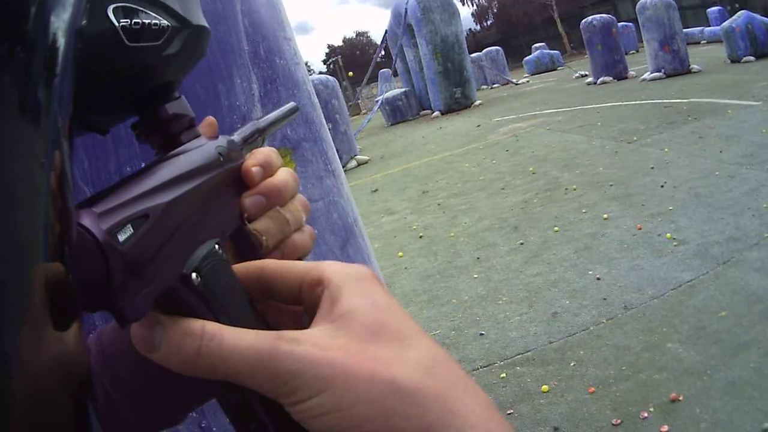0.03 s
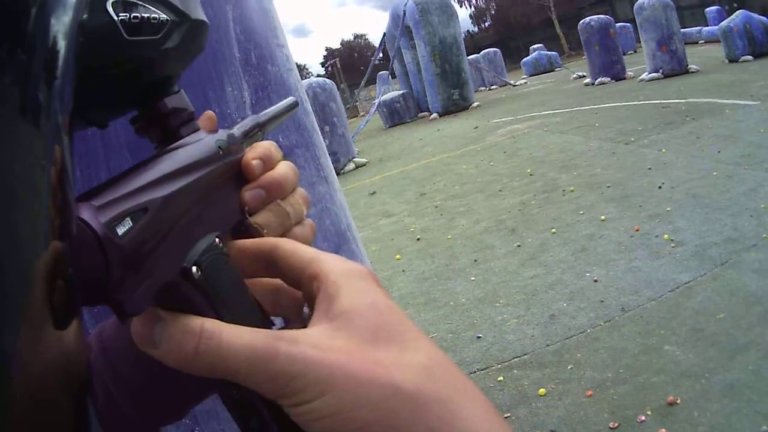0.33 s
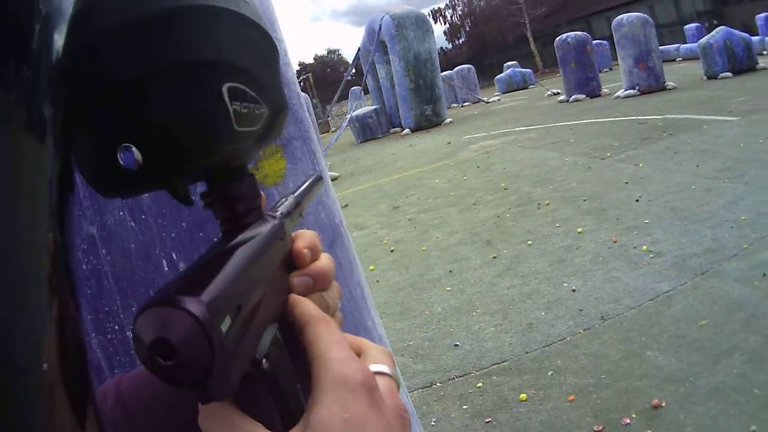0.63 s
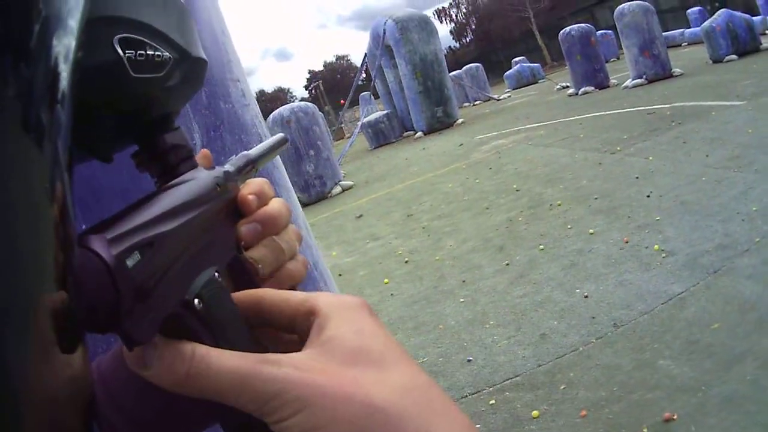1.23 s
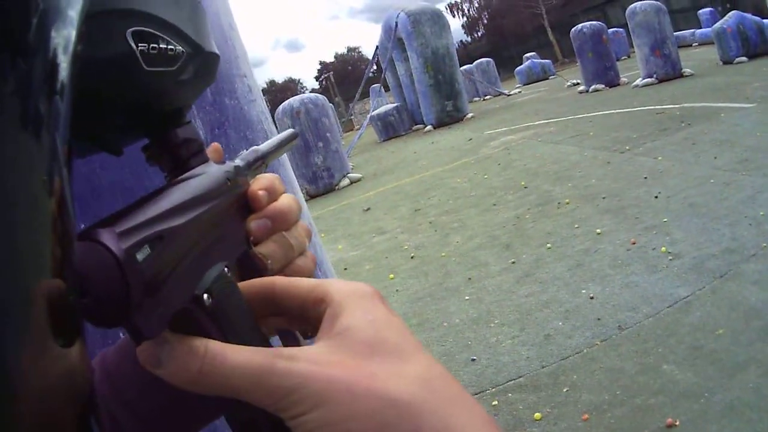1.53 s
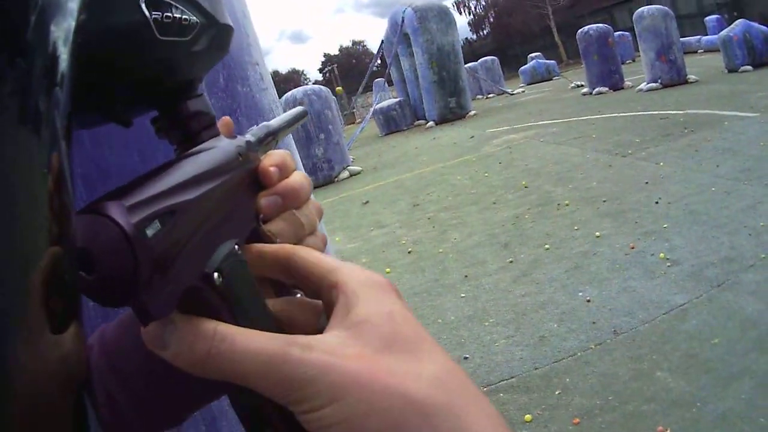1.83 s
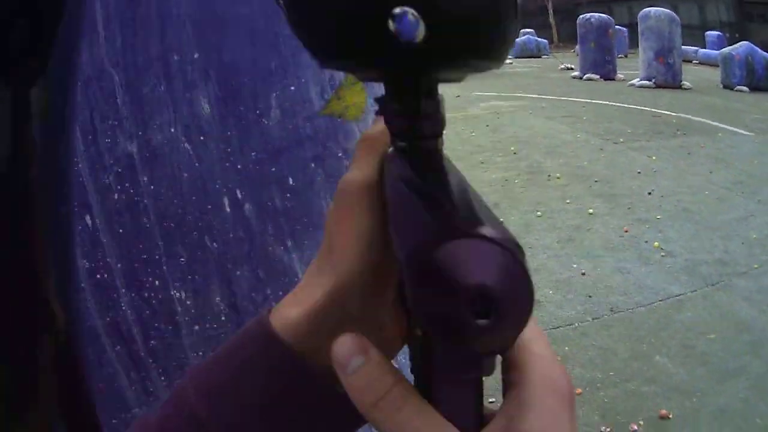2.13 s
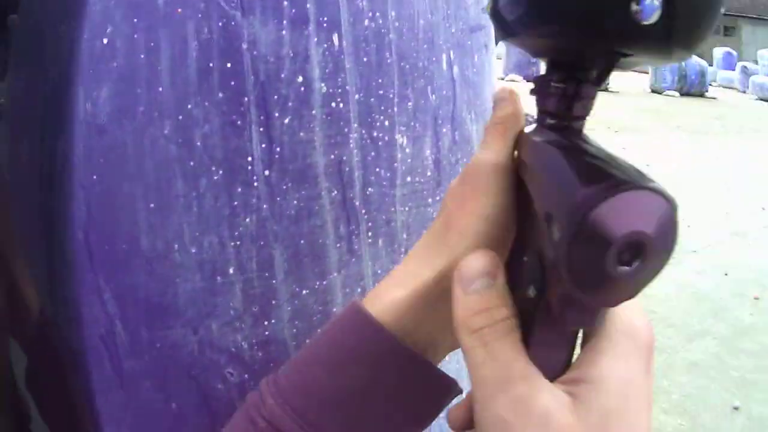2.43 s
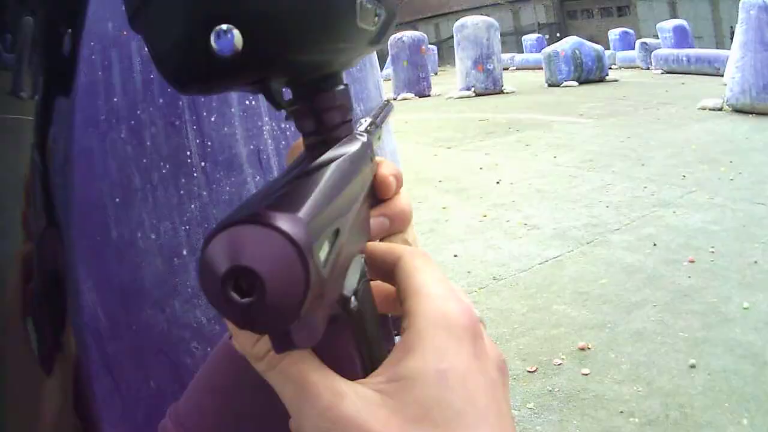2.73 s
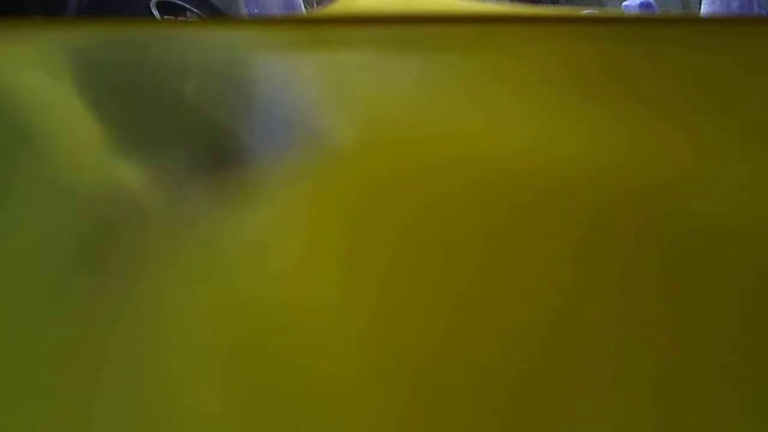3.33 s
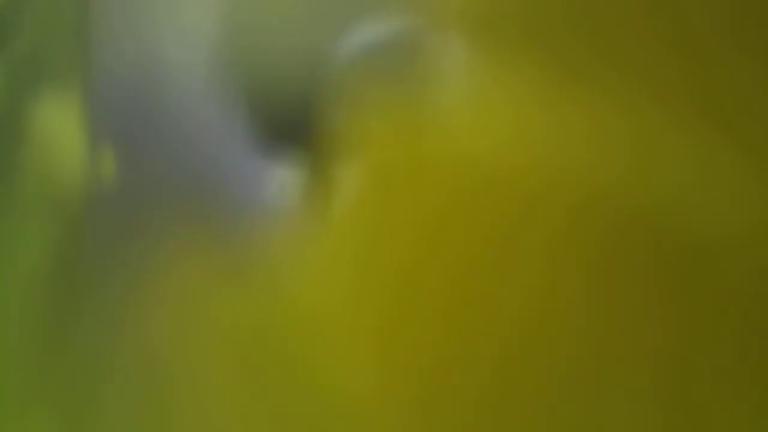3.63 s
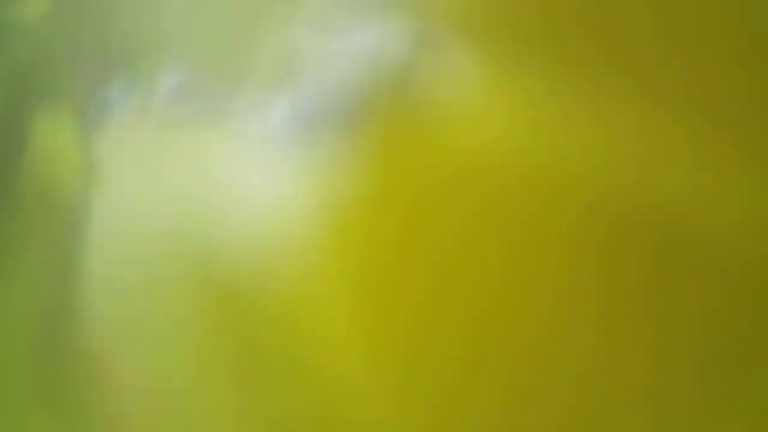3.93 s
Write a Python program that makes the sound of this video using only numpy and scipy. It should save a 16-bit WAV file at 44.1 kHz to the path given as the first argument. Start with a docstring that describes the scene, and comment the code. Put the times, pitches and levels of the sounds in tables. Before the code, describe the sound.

A paintball marker fires close by with quiet, dull pops and clacks: two at the start, then seven from about 1 to 1.8 seconds, quickening. Dry clicks fall between and after them, and distant markers pop with an echo around 2 and 3 seconds. At about 3.3 seconds a ball bursts on the microphone's plastic housing with a far louder, overloaded smack. Faint muffled outdoor air and low rumble run throughout.

```python
"""On an open field, a paintball marker (an air gun) fires close to a camera in a sealed plastic housing.
Each shot is a dull pop of air, two knocks of the sliding bolt and a clack as it shuts. Dry clicks come
between the shots, and far markers answer. Then a ball bursts on the housing and overloads the microphone.
Behind it all are faint squeaks, muffled outdoor air, a low throb and the rumble of the moving camera."""
import sys
import numpy as np
from scipy import signal
from scipy.fft import rfft, irfft
from scipy.io import wavfile
from scipy.ndimage import uniform_filter1d

SR = 44100
rng = np.random.default_rng(int(sys.argv[2]) if len(sys.argv) > 2 else 0)


def file_out(sig):
    """Save sig as 16-bit WAV at sys.argv[1]."""
    # one column per channel
    cols = np.atleast_2d(sig).T
    # limit, then scale
    lim = np.clip(cols, -1, 1)
    pcm = np.round(lim * 32767).astype(np.int16)
    wavfile.write(sys.argv[1], SR, pcm)


N = 176400
T = np.arange(round(.6 * SR)) / SR  # seconds since the start of one short sound


# when the near marker fires (t/s, pop level/dB, bolt level/dB, clack level/dB)
SHOTS = [(0.0227, -38.5, -43, -36.5), (0.2752, -38, -42.5, -38), (1.0525, -36.5, -42, -36),
         (1.2260, -39, -44, -35), (1.386, -39.5, -41.5, -36), (1.5796, -38.5, -41, -37),
         (1.6600, -40, -42.5, -33.5), (1.7427, -40, -44, -35), (1.8257, -39, -43.5, -33.5)]
# knocks of the sliding bolt (t/s after the pop, level/dB added to the bolt's, brightness/dB per octave)
BOLT_KNOCKS = [(0.0123, -3.5, -4), (0.0188, -4, -3)]
def marker_shots():
    """Air pops out, the bolt knocks twice as it slides, then it clacks shut and the metal rings thinly."""
    out = np.zeros(N)
    shut_s = .0275
    for start, pop_db, bolt_db, clack_db in SHOTS:
        add(out, start, pop(pop_db, tilt=0, echo_db=-22, echo_t60=.3, echo_rise=.006))
        for delay, db, tilt in BOLT_KNOCKS:
            add(out, start + delay, knock(bolt_db + db, tilt, rise=.0013, grit_db=-4))
        add(out, start + shut_s, knock(clack_db, tilt=.87, rise=.004, grit_db=-18.5))
        add(out, start + shut_s, tone(hz=3464, db=-55, t60=.3, rise=.004))
    return out


# tones of the air leaving the barrel (f/Hz, level/dB, fade time/s)
POP_TONES = [(480, -12, .012), (944, -7.5, 0.023), (1223, -3, .017), (1720, -34.5, .012),
             (2900, -14.5, 0.0053), (3240, -18.5, 0.046)]
# tone colour of the field's echo (f/Hz, level/dB)
ECHO_SPECTRUM = [(100, -6), (300, -6), (650, -11), (900, -5.5), (1200, 1), (1600, -12), (2200, -20),
                 (2900, -17), (3300, -10.5), (3750, -24), (5000, -42)]
def pop(db, tilt, echo_db, echo_t60, echo_rise):
    """A puff of air leaves a barrel, and its echo washes across the field."""
    puff = ring(POP_TONES, rise=.0013, tilt=tilt)
    echo = amp(echo_db) * noise(ECHO_SPECTRUM, len(T)) * fade(echo_t60, echo_rise)
    return amp(db) * (puff + echo)


# tones of the knocks and clicks, heard through the ringing camera housing (f/Hz, level/dB, fade time/s)
KNOCK_TONES = [(231.7, -19.5, 0.036), (409, -13, .025), (854, -13.5, .02), (1116, -19.5, .022),
               (1322, -12, 0.027), (1736, -13.5, 0.027), (2404, -16.5, 0.016), (2770, -18, 0.012),
               (3290, -5.5, 0.012), (3383, -0.5, 0.022), (3563, -15.5, 0.016)]
# tone colour of the gritty noise in a knock (f/Hz, level/dB)
GRIT_SPECTRUM = [(100, -5), (400, -2.5), (650, -5.5), (1200, -4.5), (2050, -6.5), (2800, -1), (3400, -6.5),
                 (4000, -2), (5000, -7)]
def knock(db, tilt, rise, grit_db, variety=1):
    """A knock heard through the camera housing: a short ring of the housing and a little grit."""
    spectrum = [(hz, level + tilt * np.log2(hz / 3000)) for hz, level in GRIT_SPECTRUM]
    grit = amp(grit_db) * noise(spectrum, len(T)) * fade(t60=.024, rise=rise)
    return amp(db) * (ring(KNOCK_TONES, rise, tilt, variety) + grit)


# dry clicks and a few duller taps, from the marker or a ball striking something
# (t/s, level/dB, brightness/dB per octave)
CLICKS = [(0.207, -59.5, -5.5), (0.6593, -40, .3), (0.8238, -38, .5), (0.9964, -39.5, -0.5),
          (1.126, -52.5, -5.5), (1.9524, -52, -4), (2.0840, -49, -3.5), (2.099, -57, -4), (2.193, -40, 1),
          (2.3952, -38, 1), (2.551, -41, -1.5)]
# tiny taps inside one click (t/s after its start, level/dB added to the click's)
CLICK_TAPS = [(0, -4.5), (.003, -0.5), (.0062, -4.5), (0.015, -9)]
def dry_clicks():
    """Clicks between the shots: each one is four quick, slightly uneven taps."""
    out = np.zeros(N)
    for start, db, tilt in CLICKS:
        for delay, tap_db in CLICK_TAPS:
            jitter_s = .00034 * rng.standard_normal()
            tap = knock(db + tap_db, tilt, rise=.0014, grit_db=-9, variety=1.63)
            add(out, start + delay + jitter_s, tap)
    return out


# when the far markers fire (t/s, level/dB)
FAR_SHOTS = [(.503, -56), (1.9620, -47), (2.948, -55), (3.0470, -50), (3.1305, -35)]
def far_markers():
    """Pops from across the field arrive duller, with a stronger and longer echo."""
    out = np.zeros(N)
    for start, db in FAR_SHOTS:
        add(out, start, pop(db, tilt=-1.25, echo_db=-9.5, echo_t60=.62, echo_rise=.004))
    return out


# tones of the struck plastic housing (f/Hz, level/dB, fade time/s)
HOUSING_TONES = [(1768, 15, .026), (3380, 0, .014), (3690, -2, .014), (2498, -24, .085), (2966, -34, .12),
                 (3058, -23, .062), (3840, -44, .17), (4172, -48, .15)]
# tone colour of the spray of paint and shell (f/Hz, level/dB)
SPLAT_SPECTRUM = [(60, -4), (250, -4), (500, -3), (850, 2), (1200, -9), (2400, -10), (3400, 0),
                  (4000, -6.5), (5000, -20)]
# low thumps and knocks after the hit, with a deep swing as the overloaded microphone recovers
# (t/s, f/Hz, level/dB, fade time/s)
THUMPS = [(3.3500, 100, -5, 0.062), (3.3534, 254, -4.5, .03), (3.3604, 448, -10, 0.0068),
          (3.3640, 46, -9, .125), (3.3792, 260, -27.5, .018), (3.579, 30, -30, 0.096)]
def ball_hit():
    """A ball touches with a tick, bursts and makes the housing ring; low thumps follow."""
    out = np.zeros(N)
    touch_s, burst_s, spray_length_s = 3.3434, 3.3451, .0128
    add(out, touch_s, tone(hz=3200, db=-4, t60=.0048, rise=.0003))
    add(out, touch_s, amp(-13.5) * noise(SPLAT_SPECTRUM, len(T)) * fade(t60=.0048, rise=.00049))
    add(out, burst_s, ring(HOUSING_TONES, rise=.0015, variety=0))
    spray = amp(2) * noise(SPLAT_SPECTRUM, len(T)) * fade(t60=.05, rise=.00036)
    quick_stop = 1 / (1 + (T / spray_length_s) ** 8)
    add(out, burst_s, spray * quick_stop)
    for start, hz, db, t60 in THUMPS:
        add(out, start, tone(hz, db, t60, rise=.00041))
    return out


# faint squeaks (t/s, length/s, first f/Hz, last f/Hz, level/dB)
SQUEAKS = [(2.232, 0.042, 1660, 1764, -59), (2.713, 0.084, 1334, 1420, -60.5),
           (2.782, 0.106, 1724, 1835, -62.5)]
def squeaks():
    """Faint, unsteady tones swell and fade as they slide upward."""
    out = np.zeros(N)
    for start, length, from_hz, to_hz, db in SQUEAKS:
        progress = np.linspace(0, 1, round(length * SR))
        waver = .006 * unit(uniform_filter1d(rng.standard_normal(len(T)), size=200))[:len(progress)]
        hz = (from_hz + (to_hz - from_hz) * progress) * (1 + waver)
        swell = np.sin(np.pi * progress)
        add(out, start, amp(db) * swell * np.sin(2 * np.pi * np.cumsum(hz) / SR))
    return out


# tone colour of the muffled outdoor air (f/Hz, level/dB)
AIR_SPECTRUM = [(65, -39), (110, -7.5), (151, -1), (616, -10), (861, -12.5), (1360, -12), (1490, -18),
                (1740, -12.5), (1900, -18.5), (3500, -17), (4200, -29), (5460, -58), (9240, -120)]
# how the air swells and sinks around its usual level (t/s, level/dB)
AIR_SWELL = [(0, 1), (.9, -0.5), (1.9, 1), (2.2, 3), (2.7, 0.5), (3.3, 1), (3.9, -1)]
def outdoor_air():
    """A soft, muffled hiss whose tone colour flickers a little."""
    usual_db, flicker_db = -60.5, 1
    grid = signal.stft(noise(AIR_SPECTRUM, N), nperseg=1024)[2]  # rows are pitches, columns are moments
    patches = uniform_filter1d(rng.standard_normal(grid.shape), size=10, axis=0)
    patches = unit(uniform_filter1d(patches, size=8, axis=1))
    hiss = signal.istft(grid * amp(flicker_db * patches), nperseg=1024)[1][:N]
    return amp(usual_db) * hiss * level_curve(AIR_SWELL)


# tones of the low throb (multiple of the throb rate, level/dB)
THROB_TONES = [(1, -51.5), (2, -52.5), (3, -61.5), (4, -62.5)]
# how the throb swells and sinks (t/s, level/dB added to its tones)
THROB_SWELL = [(0, 2), (1.8, 1.5), (2.4, 2), (3.3, -2), (4, -7)]
def camera_throb():
    """A low, almost regular throb in the camera."""
    rate_hz = 23.76
    drift = .032 * noise([(1, -3), (3, -19)], N)
    cycles = rate_hz * np.arange(N) / SR + drift
    throb = -sum(amp(db) * np.cos(2 * np.pi * multiple * cycles) for multiple, db in THROB_TONES)
    return throb * level_curve(THROB_SWELL)


# tone colour of the moving camera's rumble (f/Hz, level/dB)
RUMBLE_SPECTRUM = [(8, -7), (18, -0.5), (60, -3), (120, -17), (200, -31.5)]
# how loud the rumble is (t/s, level/dB)
RUMBLE_LEVEL = [(0, -53.5), (1.699, -53.5), (2.3, -49.5), (3.199, -50), (3.9, -53)]
def camera_rumble():
    """The camera rumbles as it moves with the person wearing it."""
    return noise(RUMBLE_SPECTRUM, N) * level_curve(RUMBLE_LEVEL)


def ring(tones, rise, tilt=0, variety=1):
    """Several fading tones. Tilt (dB per octave) brightens them; variety makes each ring differ."""
    out, sign = np.zeros(len(T)), 1
    chances = variety * rng.standard_normal((len(tones), 2))
    for (hz, db, t60), (level_chance, pitch_chance) in zip(tones, chances):
        gain = amp(db + tilt * np.log2(hz / 3000) + .7 * level_chance)
        pitch = hz * (1 + .0075 * pitch_chance)
        out += sign * gain * fade(t60, rise) * np.sin(2 * np.pi * pitch * T)
        sign = -sign  # every other tone swings the opposite way
    return out


def tone(hz, db, t60, rise):
    """One fading tone, the same every time."""
    return ring([(hz, db, t60)], rise, variety=0)


def fade(t60, rise):
    """Swells to one in about rise seconds, then drops 60 dB every t60 seconds (the fade time)."""
    shape = (1 - np.exp(-(T / rise) ** 2)) * amp(-60 * T / t60)
    return shape / shape.max()


def noise(spectrum, size):
    """Noise of strength one with the given tone colour, dying away above its highest point."""
    hz = np.fft.rfftfreq(size, 1 / SR)
    points_hz, points_db = np.transpose(spectrum)
    gain = amp(np.interp(np.log(hz + 1), np.log(points_hz + 1), points_db))
    gain /= 1 + (hz / (2 * points_hz[-1])) ** 8
    return unit(irfft(rfft(rng.standard_normal(size)) * gain, size))


def level_curve(points):
    """Joins (t/s, level/dB) points into a volume curve for the whole scene."""
    return amp(np.interp(np.arange(N) / SR, *np.transpose(points)))


def amp(db):
    """Turns decibels into a number to multiply by."""
    return 10 ** (np.asarray(db) / 20)


def unit(x):
    """Scales a signal to an average strength (rms) of one."""
    return x / np.sqrt(np.mean(x ** 2) + 1e-20)


def add(mix, start, sound):
    """Mixes a sound in at a start time in seconds."""
    part = mix[max(round(start * SR), 0):][:len(sound)]
    part += sound[:len(part)]


def scene():
    """Everything that reaches the microphone, in one channel."""
    game = marker_shots() + dry_clicks() + far_markers() + ball_hit()
    background = squeaks() + outdoor_air() + camera_throb() + camera_rumble()
    return (game + background)[None]


def record(dry):
    """The microphone squashes loud peaks and loses treble; its electronics flatten what is too loud."""
    soft_limit, hard_limit = amp(-2.5), amp(-3)
    treble_hz, highest_hz = 3994, 16200
    squashed = soft_limit * np.tanh(dry / soft_limit)
    dull = signal.sosfilt(signal.butter(18, treble_hz, fs=SR, output="sos"), squashed)
    flattened = np.clip(dull, -hard_limit, hard_limit)
    top_cut = signal.firwin(255, highest_hz, window=("kaiser", 9), fs=SR)
    return signal.oaconvolve(flattened, top_cut[None], "same")


dry = scene()
out = record(dry)
file_out(out)
```